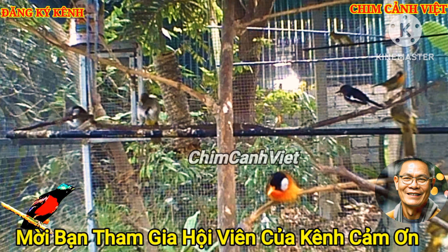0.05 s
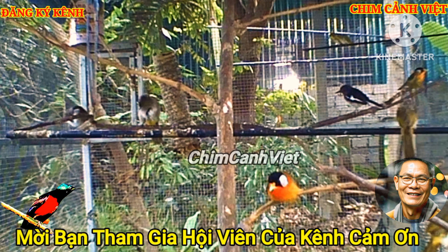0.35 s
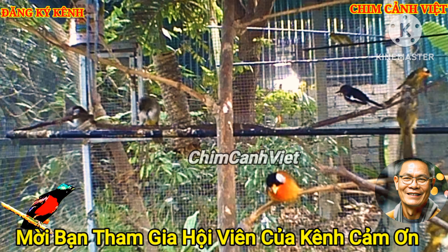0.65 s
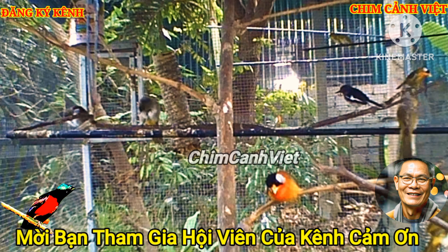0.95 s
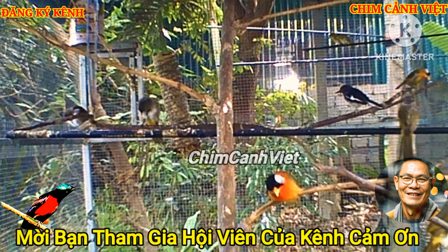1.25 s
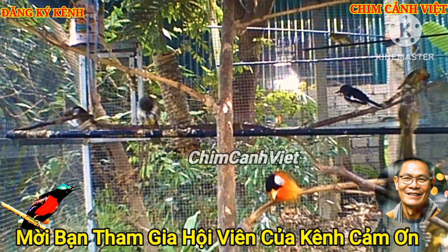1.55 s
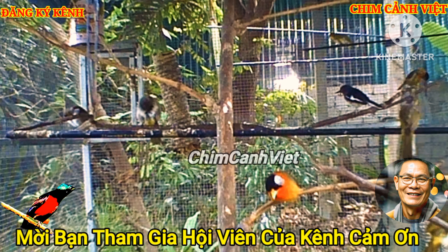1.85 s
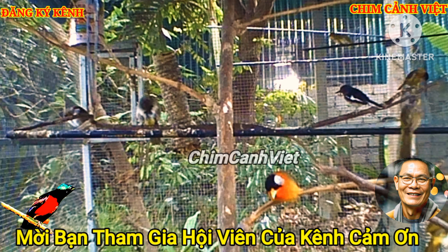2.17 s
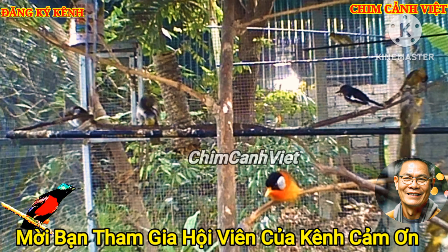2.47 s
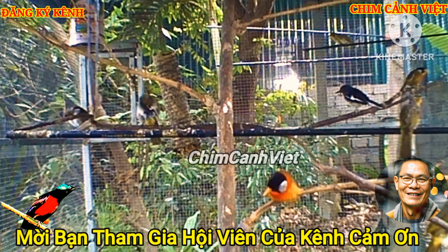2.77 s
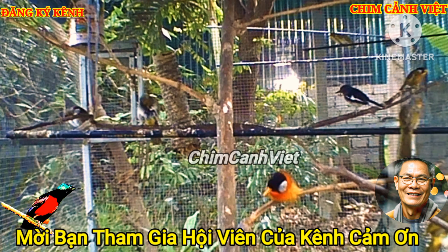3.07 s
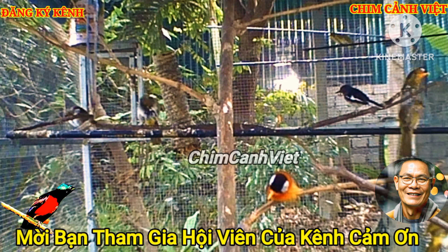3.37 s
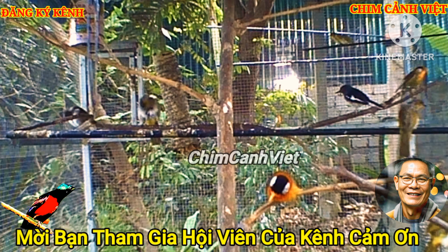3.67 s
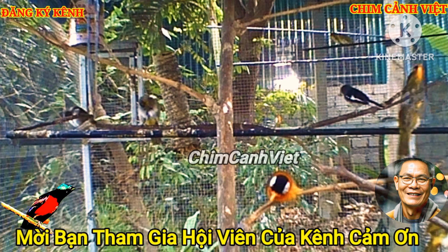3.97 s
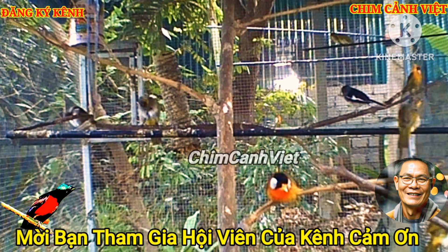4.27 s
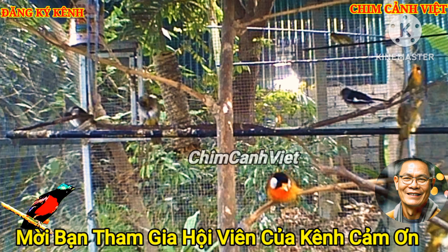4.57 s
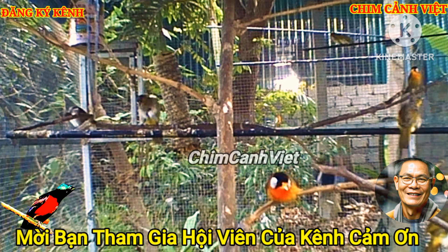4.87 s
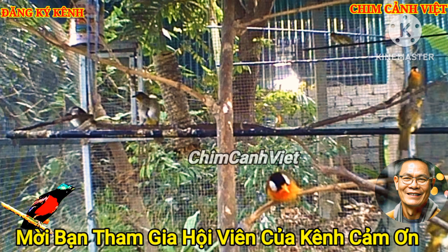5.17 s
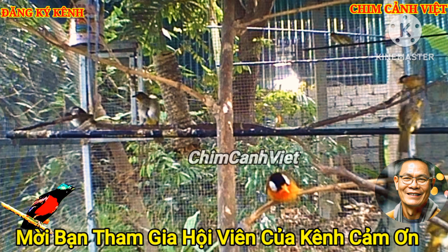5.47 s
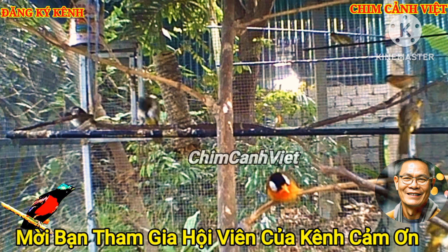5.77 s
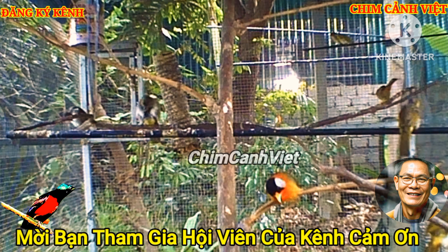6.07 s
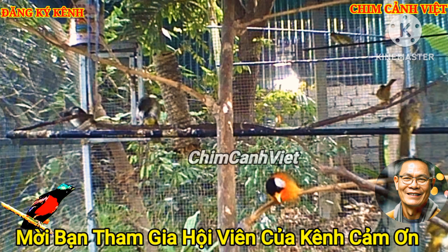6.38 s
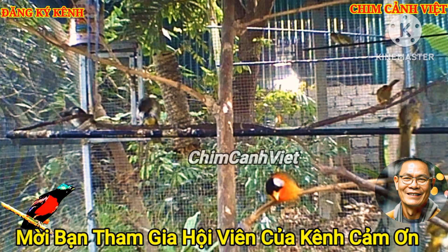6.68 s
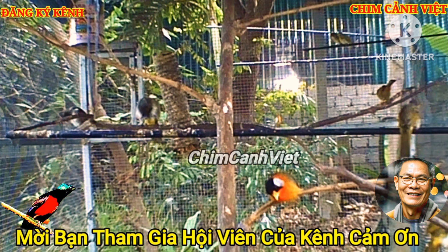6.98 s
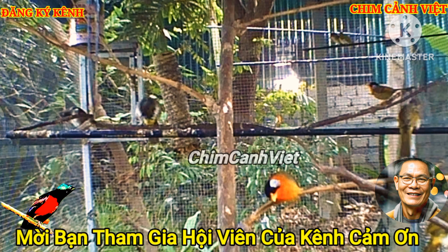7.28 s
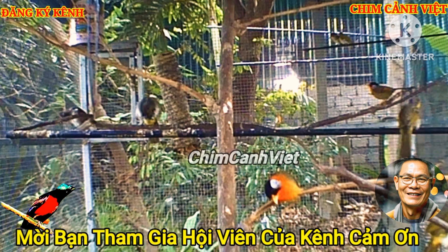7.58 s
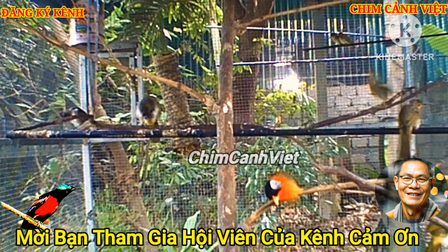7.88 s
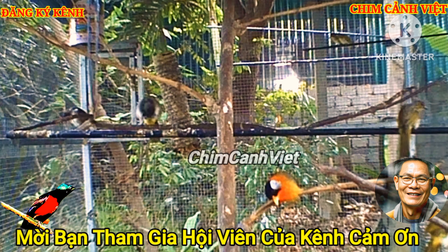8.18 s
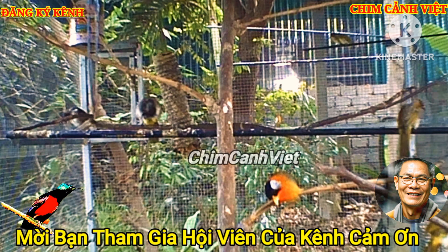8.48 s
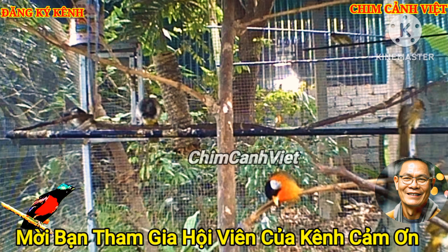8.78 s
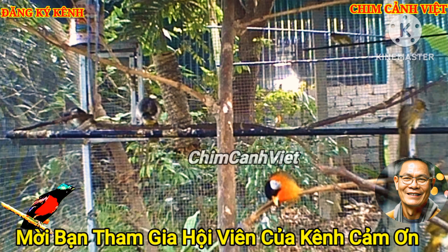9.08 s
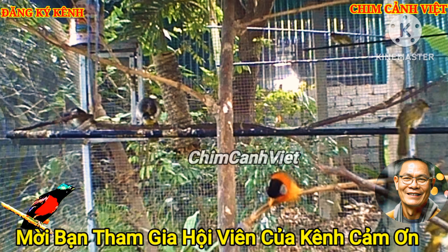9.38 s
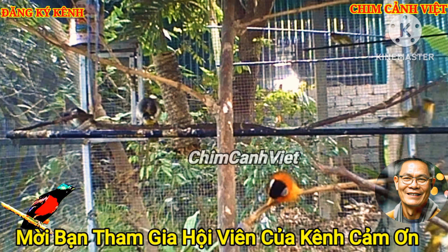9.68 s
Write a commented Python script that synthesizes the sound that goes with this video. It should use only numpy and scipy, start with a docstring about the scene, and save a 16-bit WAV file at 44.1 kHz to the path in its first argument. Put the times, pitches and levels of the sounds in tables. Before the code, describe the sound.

In an outdoor aviary, small songbirds trade high buzzy falling calls, peeps and soft chucks in bursts with short lulls. A sharp shriek is followed by a loud, close warble of quick upward flicks, a few soft wingbeats, and a run of wavering whistles. The twittering thickens again at the end. Faint distant coos and a low rumble sit behind, picked up by one microphone with little top end.

```python
"""An outdoor aviary, where small songbirds call before one microphone with little top end.
Each voice is a near-sinusoid gliding in pitch; fast modulation spreads it into a buzz. A flock gives
downslurs, peeps, chucks and shrieks, one bird warbles a low liquid phrase, and another whistles loudly.
Wings whirr and fan the microphone with turbulence, and faint coos come from afar over a low rumble.
Reflections from ground, roof and walls follow every call."""
import sys
import numpy as np
from scipy import signal
from scipy.fft import rfft, irfft
from scipy.io import wavfile
from scipy.ndimage import uniform_filter1d, minimum_filter1d, map_coordinates

SR = 44100
rng = np.random.default_rng(int(sys.argv[2]) if len(sys.argv) > 2 else 0)


def master(y):
    """Save y as 16-bit WAV."""
    cut = np.clip(np.atleast_2d(y).T, -1, 1)
    pcm = np.round(cut * 32767)  # scale
    wavfile.write(sys.argv[1], SR, pcm.astype(np.int16))


N = 438354


def amp(db):
    """Amplitude ratio: a factor of ten for every 20 dB."""
    return 10 ** (np.asarray(db) / 20)


def unit_rms(x):
    """Normalisation to a mean power of one."""
    return x / np.sqrt(np.mean(x ** 2) + 1e-20)


def at_frequency(points, hz):
    """Interpolation on a logarithmic frequency axis."""
    f, value = np.transpose(points)
    return np.interp(np.log(hz + 1), np.log(f + 1), value)


def level(curve):
    """Amplitude envelope through points of (seconds, dB)."""
    return amp(np.interp(np.arange(N) / SR, *np.transpose(curve)))


def add(mix, start, sound):
    """Superposition: a sound joins the mix at a time in seconds."""
    part = mix[max(round(start * SR), 0):][:len(sound)]
    part += sound[:len(part)]


def coloured(x, spectrum):
    """Linear filtering by a response given as points of (Hz, dB)."""
    return irfft(rfft(x) * amp(at_frequency(spectrum, np.fft.rfftfreq(N, 1 / SR))), N)


def wander(size, rate_hz):
    """Smooth random modulation of about unit size."""
    at = np.arange(size) * rate_hz / SR
    return map_coordinates(rng.standard_normal(int(at[-1]) + 4), [at + 1], order=3, mode="nearest")


def fade(t, rise, fall):
    """Raised-cosine attack and release, in seconds."""
    return np.sin(np.pi / 2 * np.clip(t / rise, 0, 1) * np.clip((t[-1] - t) / fall, 0, 1)) ** 2


def arch(length, start_hz, middle_hz, end_hz):
    """Time and pitch of a glide that is parabolic in log frequency."""
    t = np.arange(0, length, 1 / SR)
    parabola = np.polyfit([0, .5, 1], np.log([start_hz, middle_hz, end_hz]), 2)
    return t, np.exp(np.polyval(parabola, t / length))


def glide(t, turns):
    """Cosine interpolation of pitch between turning points of (seconds, Hz)."""
    times, hz = np.transpose(turns)
    steps = np.arange(len(times))
    place = np.interp(t, times, steps)
    return np.interp(np.floor(place) + np.sin(np.pi / 2 * (place % 1)) ** 2, steps, hz)


def wash(spectrum, patchy_db):
    """Coloured noise, amplitude-modulated in random patches of time and frequency."""
    bands = signal.stft(rng.standard_normal(N), SR, nperseg=1024)[2]
    patches = uniform_filter1d(rng.standard_normal(bands.shape), size=6, axis=0, mode="wrap")
    patches = unit_rms(uniform_filter1d(patches, size=9, axis=1, mode="wrap"))
    noise = signal.istft(bands * amp(patchy_db * patches), nperseg=1024)[1][:N]
    return unit_rms(coloured(noise, spectrum))


# Overtones of a bird's voice. Each entry: level in dB against the fundamental, from harmonic two up.
OVERTONES = [-29, -23, -37, -28.5]
def syrinx(hz, overtones=OVERTONES):
    """Harmonic series: the vocal organ gives a near-sine with weak multiples of its pitch."""
    phase = 2 * np.pi * np.cumsum(hz) / SR
    upper = sum(amp(db) * np.sin(k * phase) * (k * hz < SR / 2) for k, db in enumerate(overtones, 2))
    return np.sqrt(2) * (np.sin(phase) + upper)


def sung(hz, waver, flutter_db, overtones=OVERTONES):
    """Random amplitude and frequency modulation give a voice a quick tremble."""
    flutter = amp(flutter_db * wander(len(hz), 300))
    return flutter * syrinx(hz * (1 + waver * wander(len(hz), 400)), overtones)


def buzzing(hz, buzz, trill_hz=440):
    """Modulation sidebands: a fast uneven trill in pitch and strength spreads a voice into a rasp."""
    size = len(hz)
    trill = 2 * np.pi * np.cumsum(trill_hz * (1 + .25 * wander(size, 200))) / SR
    swing = buzz * (.105 * np.sin(trill) * (1 + .12 * wander(size, 90)) + .018 * wander(size, 900))
    chop = amp(buzz * (1.5 * np.cos(trill) + 2.5 * wander(size, 250) - 1))
    return chop * syrinx(hz * (1 + swing))


def buzzy_call(t, hz, buzz, wane_db, calm=.88):
    """A modulated glide: the pitch hooks up, then slides, as the buzz shrinks by the share `calm`."""
    hook = .066 * np.exp(-t / .00864)
    pitch = hz * (1 + .016 * wander(len(t), 89.65) - hook)
    depth = buzz * (1 - calm * np.sin(np.pi / 2 * t / t[-1]) ** 2)
    gain = amp(np.interp(t / t[-1], [.25, .75], [0, -wane_db]))
    return gain * buzzing(pitch, depth) * fade(t, .02, .014)


# The outdoor rumble. Each row: time in seconds, level in dB.
RUMBLE_LEVEL = [(0, -49.5), (2.3, -44.5), (3.3, -53.5), (5.9, -49), (6.7, -61.5), (8.6, -58.5),
                (9.94, -49.5)]
# Its spectrum. Each row: frequency in Hz, relative density in dB.
RUMBLE_SPECTRUM = [(15, -6), (40, -2), (85, -1), (107, 6), (135, -9), (220, -10.5), (500, -26),
                   (1500, -64.5)]
def rumble():
    """Low-frequency noise heaves under slow amplitude modulation."""
    return level(RUMBLE_LEVEL) * amp(.75 * wander(N, 6.2)) * wash(RUMBLE_SPECTRUM, patchy_db=4.5)


# Flurries of wings and leaves. Each row: peak time in seconds, decay time in seconds, level in dB.
FLURRIES = [(0, 0.71, -43), (0.999, 1, -45.5), (2.4, 0.98, -47), (2.98, 0.38, -41), (4.47, 0.31, -40.5),
            (5.01, 0.37, -40), (5.75, 0.31, -42), (7.16, 0.26, -41), (9.1, 0.28, -43), (9.55, 1, -48)]
# Their spectrum. Each row: frequency in Hz, relative density in dB.
WHIRR_SPECTRUM = [(60, -14.5), (250, -4), (500, 2.5), (800, -0.5), (1200, -3.5), (2500, -5), (4000, -10.5),
                  (7000, -37)]
def flurries(rise_s=.062, rest_db=-51.5):
    """Incoherent sources add in power: each flurry builds and dies away over a resting whirr."""
    t = np.arange(N) / SR
    power = amp(rest_db) ** 2
    for peak, decay, db in FLURRIES:
        power += (amp(db) * np.exp(-np.maximum((peak - t) / rise_s, (t - peak) / decay))) ** 2
    return np.sqrt(power) * wash(WHIRR_SPECTRUM, patchy_db=4)


# The farther flock. Each row: time in seconds, relative level in dB.
FLOCK_LEVEL = [(0, -62.5), (1.5, -62), (3.4, -47.5), (4.8, -56.5), (6, -51.5), (8.4, -55.5), (9.94, -41)]
# Spectrum of its blended voices. Each row: frequency in Hz, relative density in dB.
FLOCK_SPECTRUM = [(1000, -27.5), (2000, -6), (2800, -0.5), (3600, -8.5), (4800, -17.5), (6200, -5.5),
                  (7000, -2.5), (9000, -20)]
def far_flock(count=110):
    """Superposition of many voices: returns random downslurs, and the haze of noise behind them."""
    calls = np.zeros(N)
    for k, (when, high, long, buzz) in enumerate(rng.random((count, 4))):
        start_hz = 4200 + 2800 * np.sqrt(high)
        t, hz = arch(.1 + .093 * long, start_hz, .82 * start_hz, .65 * start_hz)
        add(calls, (k + when) / count * N / SR, buzzy_call(t, hz, np.sqrt(buzz), wane_db=2))
    gain = level(FLOCK_LEVEL)
    return amp(-9.5) * gain * unit_rms(calls), gain * wash(FLOCK_SPECTRUM, patchy_db=7)


# Buzzy falling calls. Each row: start and length in seconds, first and last pitch in Hz, level in dB.
DOWNSLURS = [(0, 0.14, 6850, 3910, -40.5), (0.578, 0.14, 5180, 3655, -38), (0.739, 0.09, 6330, 4640, -32.5),
             (1.469, 0.07, 3800, 2927, -31.5), (1.838, .15, 4130, 2907, -34),
             (1.918, 0.14, 6030, 4126, -32.5), (2.184, 0.11, 6400, 4510, -31.5),
             (2.281, 0.14, 4620, 4280, -38.5), (2.751, 0.13, 5500, 3664, -34.5),
             (3.571, 0.17, 6330, 4650, -44), (4.039, 0.16, 6320, 3820, -40.5),
             (4.59, 0.12, 6350, 4280, -40.5), (5.289, 0.16, 5380, 3784, -40.5),
             (5.771, 0.21, 6400, 3723, -38), (6.08, 0.18, 6190, 3767, -31.5),
             (6.914, 0.15, 6230, 4410, -39.5), (7.728, 0.088, 6320, 4740, -43.5),
             (8.071, 0.12, 6370, 3930, -48.5), (8.168, .075, 5550, 4290, -51.5),
             (8.688, 0.15, 6040, 4250, -48.5), (9.05, 0.14, 6430, 4180, -42), (9.225, 0.2, 6810, 3634, -43),
             (9.538, 0.077, 6190, 4490, -36.5), (9.722, 0.075, 5980, 4215, -31.5),
             (9.779, 0.11, 5340, 3904, -35), (9.835, 0.12, 6330, 4360, -31.5)]
def downslurs(early_fall=.6, full_buzz_hz=6300, hold_s=.1, wane_db_per_s=30):
    """Falling frequency sweeps that flatten out; the higher the start, the deeper the modulation."""
    out = np.zeros(N)
    for start, length, start_hz, end_hz, db in DOWNSLURS:
        t, hz = arch(length, start_hz, start_hz * (end_hz / start_hz) ** early_fall, end_hz)
        wane_db = wane_db_per_s * max(length - hold_s, 0)
        add(out, start, amp(db) * buzzy_call(t, hz, start_hz / full_buzz_hz, wane_db))
    return out


def clear_note(t, hz, waver=.013, drift=.01, flutter_db=2):
    """Jitter and shimmer unsettle pitch and strength; the longer the note, the purer it is."""
    unsteady = min(1, .055 / t[-1])
    jitter = unsteady * waver * wander(len(t), 400) + np.sqrt(unsteady) * drift * wander(len(t), 50)
    shimmer = amp(unsteady * flutter_db * wander(len(t), 120))
    return shimmer * syrinx(hz * (1 + jitter)) * fade(t, .016, .012)


# Clear falling notes. Each row: start and length in seconds, first and last pitch in Hz, level in dB.
SIGHS = [(0.04, 0.054, 2880, 2226, -27.5), (0.06, 0.058, 2076, 1833, -30),
         (0.322, 0.048, 2190, 2096, -33.5), (0.352, 0.065, 2676, 2180, -31), (0.581, 0.02, 2300, 1990, -25),
         (0.589, 0.092, 2734, 2375, -35), (0.865, 0.26, 4385, 3898, -37.5), (1.41, 0.13, 4880, 4200, -44.5),
         (3.153, 0.17, 3490, 3016, -38), (3.522, 0.058, 4005, 3780, -36.5),
         (4.448, 0.15, 2525, 2277, -33.5), (4.57, 0.11, 2170, 1756, -42.5), (1.799, 0.087, 4760, 4545, -34),
         (3.871, 0.23, 2936, 2765, -47), (5.941, 0.08, 2970, 2775, -36.5), (6.285, .115, 4450, 4000, -56),
         (5.18, 0.022, 4060, 3770, -41), (6.398, 0.028, 1980, 1840, -39.5),
         (8.968, 0.066, 5990, 4800, -55.5), (9.016, 0.082, 4760, 4630, -49.5),
         (9.449, 0.095, 2030, 1967, -30), (9.481, 0.087, 2700, 2603, -36), (9.523, 0.25, 3137, 3082, -43.5)]
def sighs(early_fall=.6):
    """Downward glides of a near-pure tone, with the share `early_fall` covered by mid-note."""
    out = np.zeros(N)
    for start, length, start_hz, end_hz, db in SIGHS:
        t, hz = arch(length, start_hz, start_hz * (end_hz / start_hz) ** early_fall, end_hz)
        add(out, start, amp(db) * clear_note(t, hz))
    return out


# The flock's peeps. Each row: start and length in seconds, target pitch in Hz, level in dB.
PEEPS = [(0.226, 0.05, 2918, -26.5), (0.458, 0.046, 3002, -27.5), (4.894, 0.03, 4220, -36.5),
         (4.93, 0.042, 3045, -33.5), (5.021, 0.035, 4115, -37), (5.062, 0.056, 2980, -33),
         (5.867, 0.069, 2438, -29), (5.997, 0.1, 2632, -34.5), (7.605, 0.086, 5404, -36),
         (8.368, 0.096, 3424, -55.5), (8.43, 0.085, 5380, -37.5), (8.688, 0.21, 2690, -43.5),
         (8.87, 0.117, 2710, -36.5), (9.865, 0.081, 2320, -45)]
def peeps(scoop_hz=380, scoop_s=.0097, sag=.0351):
    """Exponential approach: the pitch scoops up towards its note, then sags a little."""
    out = np.zeros(N)
    for start, length, hz, db in PEEPS:
        t = np.arange(0, length, 1 / SR)
        pitch = hz * (1 - sag * t / length) - scoop_hz * np.exp(-t / scoop_s)
        add(out, start, amp(db) * clear_note(t, pitch))
    return out


# Rasping calls. Each row: start and length in seconds, first and last pitch in Hz, level in dB,
# buzz from 0 to 1.
RASPS = [(0.378, .135, 5760, 4850, -30, 0.74), (0.58, 0.081, 5760, 5380, -31, 0.92),
         (0.879, 0.35, 6230, 5700, -47, 1), (1.142, 0.17, 6380, 5970, -34.5, 1),
         (1.266, 0.24, 6050, 5980, -39.5, 1), (1.212, 0.15, 3130, 3910, -35.5, 0.37),
         (1.444, 0.15, 6440, 6400, -35, 1), (1.609, 0.084, 5120, 4840, -38.5, 0.5),
         (1.624, 0.14, 6790, 6410, -34.5, 0.6), (1.793, 0.21, 6840, 5980, -32.5, 0.85),
         (2.19, 0.033, 2450, 2336, -34, 0), (2.274, .11, 6180, 5710, -39.5, 1),
         (1.577, 0.13, 2950, 2470, -40.5, 0.8), (2.989, 0.13, 4900, 5130, -39.5, 0.76),
         (3.269, 0.093, 3000, 2874, -37, 0.65), (4.936, 0.096, 5630, 6450, -55, 1),
         (5.193, 0.14, 3110, 2624, -41.5, 1), (5.463, 0.073, 1694, 2305, -37.5, 1),
         (5.472, 0.078, 5100, 5740, -43.5, 0.8), (5.665, 0.092, 1607, 2210, -38.5, 1),
         (5.665, 0.074, 4760, 5630, -41.5, 0.56), (6.561, 0.098, 6680, 5620, -37, 1),
         (6.59, 0.046, 4900, 4790, -34.5, 0.2), (9.355, 0.22, 6170, 5200, -48, 0.97),
         (9.696, 0.3, 5980, 5270, -37.5, 0.96)]
def rasps(lift=.017):
    """Sustained modulation keeps a gently arching call rough to its end."""
    out = np.zeros(N)
    for start, length, start_hz, end_hz, db, buzz in RASPS:
        t, hz = arch(length, start_hz, np.sqrt(start_hz * end_hz) * (1 + lift), end_hz)
        add(out, start, amp(db) * buzzy_call(t, hz, buzz, wane_db=.5, calm=.17))
    return out


# Soft chucks. Each row: time of the dip and rise time in seconds, bottom and top pitch in Hz,
# relative level in dB.
CHUCKS = [(0.681, 0.029, 1400, 1900, -45.5), (0.824, .032, 1484, 1804, -44), (.968, 0.016, 1494, 2760, -44),
          (0.994, 0.01, 1260, 3440, -39.5), (1.109, 0.012, 1570, 2620, -42),
          (1.136, 0.014, 1696, 2600, -36), (1.18, 0.015, 1320, 2600, -39.5),
          (2.205, 0.026, 1200, 3100, -42.5), (2.236, 0.016, 1243, 2990, -37),
          (2.347, 0.027, 2076, 2720, -35.5), (2.375, 0.014, 1515, 2050, -36.5),
          (2.973, 0.039, 1580, 2230, -42), (3.055, 0.024, 1757, 2210, -43), (3.195, 0.019, 980, 2040, -43),
          (5.605, 0.014, 1360, 2700, -41), (5.632, 0.018, 1256, 2810, -39), (5.764, 0.011, 1435, 2500, -40),
          (7.678, 0.011, 1190, 2710, -38), (7.703, 0.019, 1173, 2440, -40.5),
          (7.775, 0.023, 1717, 2470, -37.5), (7.916, 0.012, 1200, 2620, -41),
          (7.937, 0.02, 1585, 2420, -36.5), (7.972, 0.014, 1250, 2340, -40.5),
          (8.478, 0.024, 1575, 2740, -50), (9.107, 0.0157, 1135, 3230, -40),
          (9.138, 0.015, 1210, 3080, -39), (9.262, 0.0262, 1730, 2550, -38),
          (9.297, 0.015, 1375, 2060, -41)]
def chucks(lead_s=.0056):
    """Rapid frequency sweeps: the pitch dips, then shoots up in a few hundredths of a second."""
    out = np.zeros(N)
    for dip, rise, bottom_hz, top_hz, db in CHUCKS:
        t = np.arange(-lead_s, rise, 1 / SR)
        hz = glide(t, [(t[0], 1.25 * bottom_hz), (0, bottom_hz), (rise, top_hz)])
        gain = amp(db + 1) * fade(t - t[0], 2 * lead_s, .005)
        add(out, dip + t[0], gain * sung(hz, waver=.06, flutter_db=3.5))
    return out


# Faint far calls. Each row: start and length in seconds, pitch in Hz, relative level in dB.
COOS = [(0.824, 0.16, 326, -45.5), (1.792, 0.18, 1060, -44.5), (1.881, 0.14, 747, -41),
        (2.199, 0.23, 780, -48), (2.657, 0.22, 813, -45), (2.718, 0.11, 420, -37), (3.41, .11, 813, -47),
        (5.701, 0.18, 421, -42.5), (6.422, 0.047, 536, -36.5), (9.207, 0.27, 235.4, -51),
        (9.514, 0.14, 630, -51)]
def coos():
    """Low tones from far away waver under random modulation."""
    out = np.zeros(N)
    for start, length, hz, db in COOS:
        t = np.arange(0, length, 1 / SR)
        pitch = hz * (1 + .055 * wander(len(t), 110))
        gain = amp(db - 6 + 3 * wander(len(t), 25)) * fade(t, .03, .03)
        add(out, start, gain * syrinx(pitch))
    return out


# Dry scuffs, likely feet on a perch. Each row: peak time in seconds, level in dB.
SCUFFS = [(.908, -41), (2.897, -34.5), (6.884, -34)]
def scuffs(rise_s=.007, decay_s=.013):
    """Friction gives brief, dull bursts of noise."""
    gain, t = np.zeros(N), np.arange(-SR // 20, SR // 10) / SR
    for peak, db in SCUFFS:
        add(gain, peak + t[0], amp(db) * np.exp(-np.maximum(-t / rise_s, t / decay_s)))
    spectrum = [(600, -23), (1300, -7.5), (1900, 4.5), (2800, -.5), (4500, -18), (8000, -22.5)]
    return gain * unit_rms(coloured(rng.standard_normal(N), spectrum))


# The nearest shrieks. Each row: trill rate in Hz, then turning points of time in seconds, pitch in Hz,
# buzz from 0 to 1 and level in dB.
SHRIEKS = [ (396, [(2.368, 5920, 1, -27.5), (2.405, 5340, 0.6, -27.5), (2.428, 5350, 0.3, -21.5),
           (2.458, 4200, 0.4, -36.5), (2.505, 4050, 0.7, -24)]), (170.1, [(2.49, 6000, 1, -29),
           (2.53, 6140, 1, -21), (2.565, 5550, 1, -16), (2.587, 4560, 0.5, -21.5), (2.62, 4556, 0.1, -23),
           (2.65, 4190, 0.3, -33), (2.69, 4010, .1, -40)]), (488, [(6.32, 5950, .8, -34),
           (6.345, 6070, 0.99, -23), (6.38, 5970, 1, -21.5), (6.445, 5440, .7, -28.5)]),
           (333, [(9.625, 7010, 0.8, -41), (9.665, 6050, 0.92, -21), (9.69, 5920, 1, -29),
           (9.725, 4870, 0.8, -27)]), ]
def shrieks(edge_s=.0053):
    """Modulation depth sets roughness: a loud, close rasp thins towards a tone where its buzz drops."""
    out = np.zeros(N)
    for trill_hz, turns in SHRIEKS:
        times, *controls = np.transpose(turns)
        t = np.arange(times[0], times[-1], 1 / SR)
        hz, buzz, db = (np.interp(t, times, control) for control in controls)
        add(out, t[0], amp(db) * buzzing(hz, buzz, trill_hz) * fade(t - t[0], edge_s, edge_s))
    return out


# The warbling bird's overtones. Each entry: level in dB against the fundamental, from harmonic two up.
WARBLE_OVERTONES = [-37.5, -42.5, -57.5, -22, -30]
def warble_voice(hz):
    """Harmonic balance sets timbre: the fifth harmonic glints in this trembling voice."""
    return sung(hz, waver=.022, flutter_db=3, overtones=WARBLE_OVERTONES)


# Its upward flicks. Each row: time of the dip and rise time in seconds, top pitch in Hz,
# hold in seconds, last pitch in Hz, level at the top in dB.
WHITS = [(3.356, 0.019, 2290, 0.026, 2240, -15.5), (3.627, 0.02, 2490, 0.025, 1960, -15.5),
         (3.928, 0.018, 2190, 0.03, 2094, -16), (4.352, 0.033, 2562, 0.025, 2555, -13.5)]
def whits(low_hz=1448, lead_s=.009, db_per_octave=16):
    """Amplitude follows frequency: each flick dips, grows louder as it climbs, holds and sags."""
    out = np.zeros(N)
    for dip, rise, top_hz, hold, end_hz, db in WHITS:
        t = np.arange(-lead_s, rise + hold, 1 / SR)
        hz = glide(t, [(t[0], 1.25 * low_hz), (0, low_hz), (rise, top_hz), (t[-1], end_hz)])
        gain = amp(db + db_per_octave * np.log2(hz / top_hz)) * fade(t - t[0], lead_s, .018)
        add(out, dip + t[0], gain * warble_voice(hz))
    return out


# Its churrs. Each row: start and length in seconds, swing rate in Hz, top pitch in Hz, level in dB.
CHURRS = [(3.549, 0.035, 68, 1988, -17), (3.603, 0.026, 18.5, 1820, -15), (4.089, 0.084, 26, 1962, -22),
          (4.304, 0.037, 41.5, 1954, -22)]
def churrs(low_hz=1428, db_per_octave=1.5, edge_s=.0056):
    """Sinusoidal frequency modulation swings the voice between two pitches."""
    out = np.zeros(N)
    for start, length, rate, top_hz, db in CHURRS:
        t = np.arange(0, length, 1 / SR)
        hz = low_hz + (top_hz - low_hz) * np.cos(np.pi * rate * t) ** 2
        gain = amp(db + db_per_octave * np.log2(hz / top_hz)) * fade(t, 2 * edge_s, edge_s)
        add(out, start, gain * warble_voice(hz))
    return out


# Turning points of one high squeal. Each row: time in seconds, pitch in Hz.
SQUEAL = [(4.072, 3010), (4.085, 3277), (4.106, 2210)]
def squeal(db=-26, edge_s=.0056):
    """Deep random modulation roughens a glide that arches over the warble."""
    out = np.zeros(N)
    t = np.arange(SQUEAL[0][0], SQUEAL[-1][0], 1 / SR)
    voice = sung(glide(t, SQUEAL), waver=.06, flutter_db=6)
    add(out, t[0], amp(db) * voice * fade(t - t[0], edge_s, edge_s))
    return out


# Wingbeats that fan the microphone. Each row: peak time in seconds, level in dB.
WINGBEATS = [(5.12, -52), (5.182, -44.5), (5.445, -33), (5.544, -31.5), (5.59, -40), (5.628, -35.5),
             (5.68, -37.5)]
def wingbeats(swell_s=.015):
    """Turbulence: each stroke pushes a puff of low noise at the microphone."""
    push, age = np.zeros(N), np.arange(SR // 8) / SR / swell_s
    for peak, db in WINGBEATS:
        add(push, peak - swell_s, amp(db) * age * np.exp(1 - age))
    spectrum = [(15, -8), (50, 0), (130, -2), (350, -10), (800, -27), (3000, -55)]
    return push * unit_rms(coloured(rng.standard_normal(N), spectrum))


def whistle(hz, attack, home_hz=2750, home_db=-19, db_per_octave=4, wane_db_per_s=19):
    """Amplitude follows frequency in a loud, near-pure tone that decays exponentially."""
    t = np.arange(len(hz)) / SR
    db = home_db + db_per_octave * np.log2(hz / home_hz) - wane_db_per_s * t
    return amp(db) * fade(t, attack, .028) * sung(hz, waver=.0014, flutter_db=2.5)


# Wavy whistles. Each row: attack in seconds, then turning points of time in seconds and pitch in Hz.
WAVY_WHISTLES = [ (.009, [(6.423, 3280), (6.444, 3698), (6.476, 3150), (6.535, 3120)]),
                 (.033, [(6.96, 3075), (6.987, 2847), (7.013, 3207), (7.043, 2845), (7.083, 3665),
                 (7.135, 2670), (7.165, 2612), (7.222, 3063), (7.262, 2900)]), (.042, [(7.482, 2800),
                 (7.514, 2573), (7.538, 3106), (7.568, 2330), (7.605, 2956), (7.655, 2712), (7.7, 2932)]), ]
# The last whistle. In order: start and length in seconds, first and limiting pitch in Hz,
# sinking time constant and attack in seconds.
LONG_WHISTLE = (7.853, 0.3, 3900, 2200, .104, .022)
def whistles():
    """Frequency glides: three whistles undulate, then one sinks exponentially towards a low note."""
    out = np.zeros(N)
    for attack, turns in WAVY_WHISTLES:
        t = np.arange(turns[0][0], turns[-1][0], 1 / SR)
        add(out, t[0], whistle(glide(t, turns), attack))
    start, length, start_hz, low_hz, sink, attack = LONG_WHISTLE
    t = np.arange(0, length, 1 / SR)
    add(out, start, whistle(low_hz + (start_hz - low_hz) * np.exp(-t / sink), attack))
    return out


# Reverberation of the aviary. Each row: frequency in Hz, time to fall 60 dB in seconds.
REVERB_TIMES = [(300, 0.04), (2000, 0.54), (3200, 0.49), (7000, 0.28)]
# Early reflections from ground and roof. Each row: delay in seconds, relative gain in dB.
NEAR_ECHOES = [(.0062, -5), (0.0128, -4.5)]
# Later reflections from the walls. Each row: delay in seconds, gain in dB.
WALL_ECHOES = [(0.048, -25), (0.083, -18.5)]
def aviary(x, tail_db, near_db, build_s=.0021):
    """Convolution with the direct path, distinct echoes and a scattered tail that dies band by band."""
    scatter = rng.standard_normal(SR) * (rng.random(SR) < 2500 / SR)  # about 2500 arrivals a second
    hz, t, bands = signal.stft(scatter, SR, nperseg=256)
    decay = amp(-60 * t / at_frequency(REVERB_TIMES, hz)[:, None])
    tail = signal.istft(bands * np.clip(t / build_s, 0, 1) * decay, nperseg=256)[1]
    response = amp(tail_db) * tail / np.linalg.norm(tail)
    response[0] += 1
    for delay, db in NEAR_ECHOES:
        add(response, delay, amp([db + near_db]))
    for delay, db in WALL_ECHOES:
        add(response, delay, amp([db]))
    return signal.oaconvolve(x, response)[:N]


def scene():
    """The direct-to-reverberant ratio conveys distance: near birds are dry, farther ones reverberant."""
    birds = aviary(whits() + churrs() + squeal(), tail_db=-12.5, near_db=-8, build_s=.025)
    birds += aviary(whistles(), tail_db=-7.5, near_db=-5)
    birds += aviary(peeps() + sighs(), tail_db=-4, near_db=-1)
    birds += aviary(downslurs() + rasps(), tail_db=-.5, near_db=-2)
    birds += aviary(shrieks(), tail_db=-6, near_db=-3)
    birds += aviary(chucks() + scuffs(), tail_db=-8.5, near_db=-3)
    birds += aviary(coos(), tail_db=2, near_db=-1)
    far_calls, haze = far_flock()
    birds += aviary(far_calls, tail_db=4, near_db=-2)
    return np.tile(birds + haze + rumble() + flurries() + wingbeats(), (2, 1))


# Response of the microphone. Each row: frequency in Hz, gain in dB.
MICROPHONE = [(20, 0), (6400, 0), (6800, -5), (7200, -18), (7700, -31), (9200, -33), (10200, -19),
              (11500, -22), (13000, -27), (15000, -21)]
def record(dry, ceiling_db=-8.5, fizz_db=-33, hiss_db=-81, cutoff_hz=15600):
    """Limiting, then a steep loss above 7 kHz; overload, imaging and self-noise leave a faint fizz."""
    x, ceiling = dry[0], amp(ceiling_db)
    peak = -minimum_filter1d(-abs(x), size=200)
    reduction = uniform_filter1d(np.maximum(peak / ceiling, 1), size=100)
    x = coloured(x / reduction, MICROPHONE)
    crests = x - np.clip(x, -ceiling / 2, ceiling / 2)  # only the tallest waves distort
    x = x + amp(fizz_db) * coloured(crests, [(4000, -61), (7500, -40.5), (10000, 13)])
    mirror = x * (-1) ** np.arange(N)  # every frequency folded about a quarter of the sample rate
    x = x + coloured(mirror, [(13000, -79.5), (14500, -22), (15000, -24.5), (15600, -38)])
    x = x + amp(hiss_db) * rng.standard_normal(N)
    lowpass = signal.firwin(511, cutoff_hz, window=("kaiser", 9), fs=SR)
    return np.tile(signal.oaconvolve(x, lowpass, "same"), (2, 1))


dry = scene()
out = record(dry)
master(out)
```